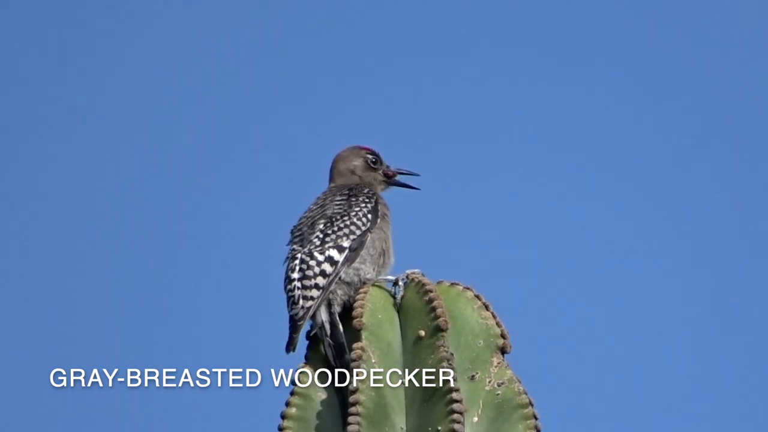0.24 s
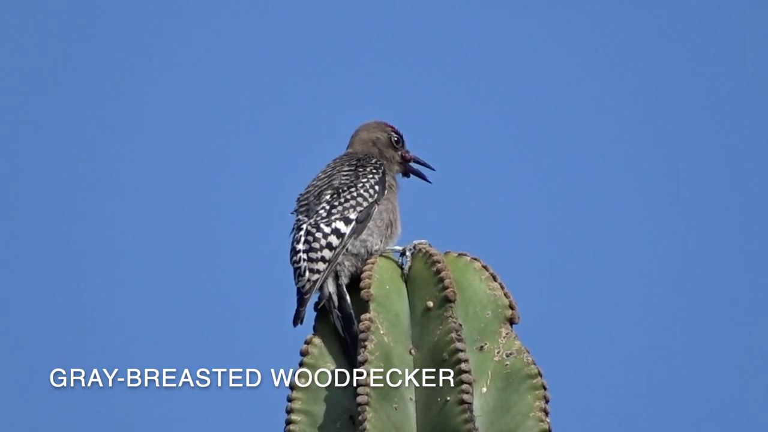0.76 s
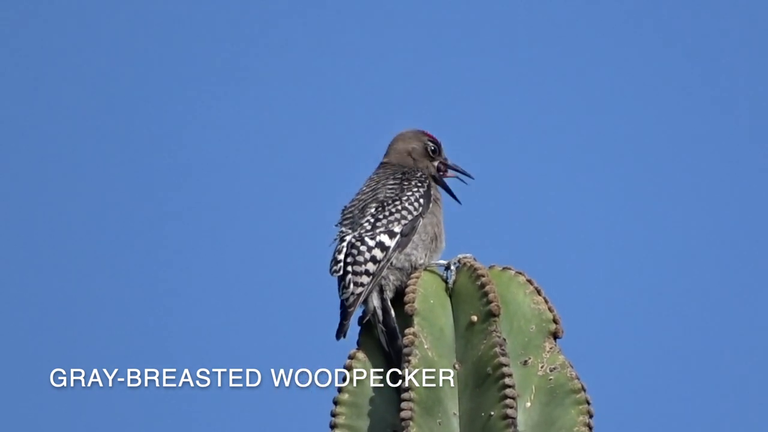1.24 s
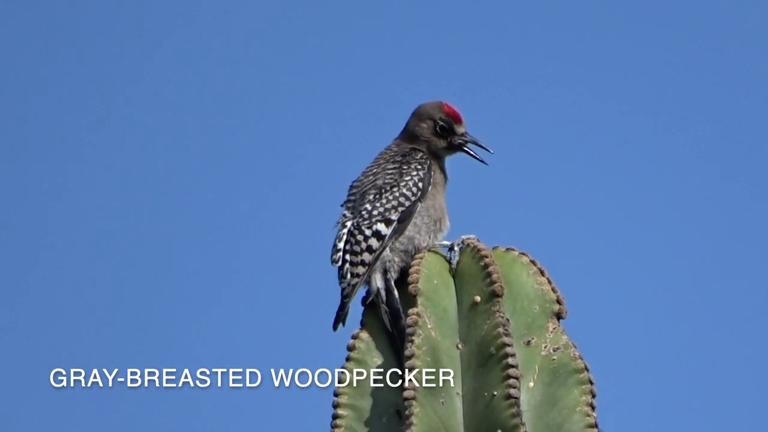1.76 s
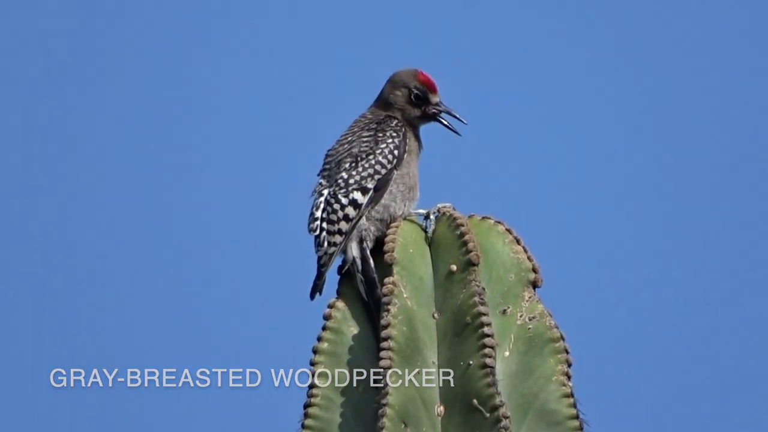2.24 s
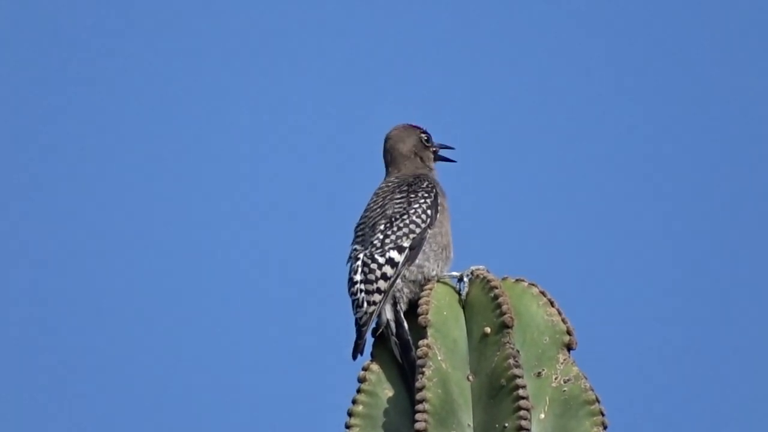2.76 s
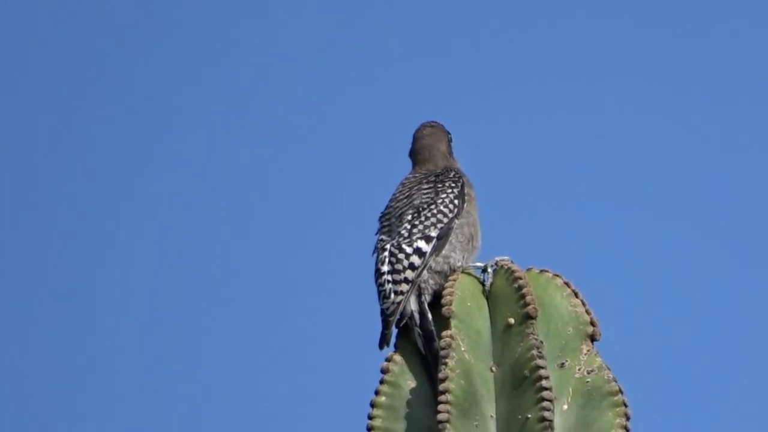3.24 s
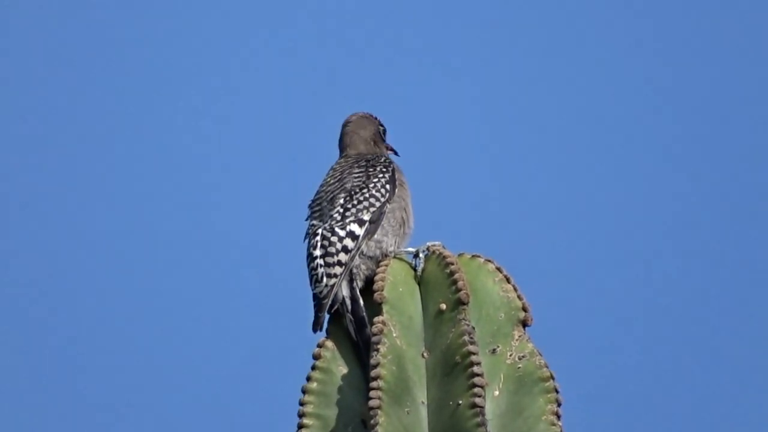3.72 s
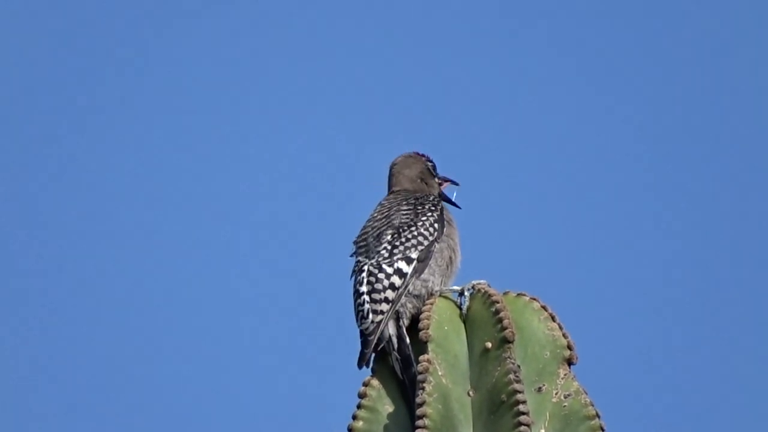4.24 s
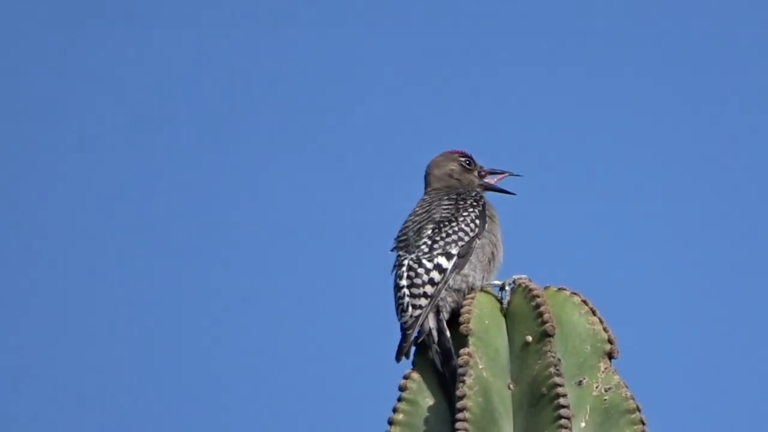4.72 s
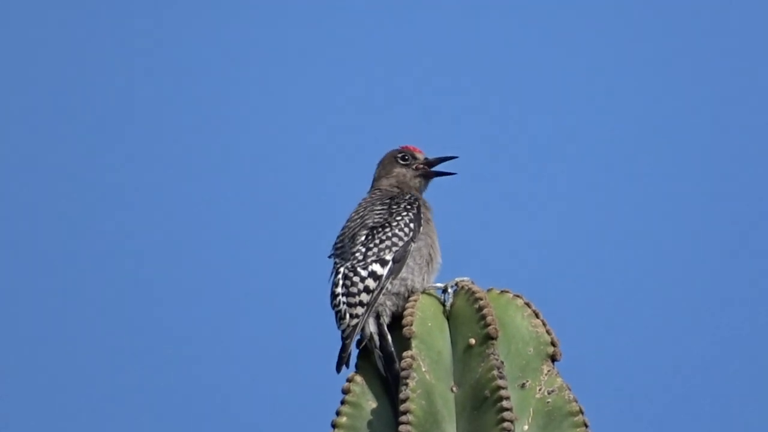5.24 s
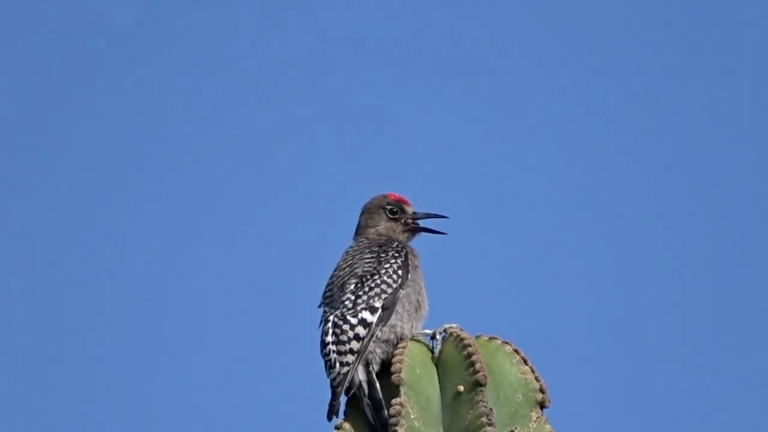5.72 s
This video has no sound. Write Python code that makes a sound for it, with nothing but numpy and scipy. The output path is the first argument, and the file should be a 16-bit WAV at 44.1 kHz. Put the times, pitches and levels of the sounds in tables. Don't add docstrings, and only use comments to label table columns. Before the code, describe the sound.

A woodpecker gives seven sharp, piercing call notes, each trailed by a much softer lower note, over faint open-air hush with insects and distant birds.

```python
import sys
import numpy as np
from scipy import signal
from scipy.fft import rfft, irfft
from scipy.io import wavfile
from scipy.ndimage import uniform_filter1d

SR = 44100
rng = np.random.default_rng(int(sys.argv[2]) if len(sys.argv) > 2 else 0)


def output_pcm(signal):
    pcm = np.clip(np.atleast_2d(signal).T, -1, 1) * 32767
    wavfile.write(sys.argv[1], SR, np.round(pcm).astype(np.int16))


def boost(x):
    u = np.asarray(x, float) / 20
    return 10 ** u


N = 263718

# f/Hz, density/dB
WASH_MID = [(12, -60), (20, -20.5), (60, -11.5), (119, -7.5), (239, -2.5), (430, -3), (839, -4),
            (1000, -7.5), (1640, -12), (3380, -20), (6430, -29.5), (9600, -28.5), (12500, -24.5),
            (15700, -22.5)]
# f/Hz, density/dB
WASH_SIDE = [(12, -55), (20, -31), (55, -23), (186, -11.5), (370, -5), (816, -3.5), (2630, -13),
             (6250, -29.5), (8000, -31.5), (10000, -33), (13600, -29.5), (15700, -42)]
# f/Hz, width/Hz, level/dB, flicker/dB
STEADY_BANDS = [
    (429.8, 40, -68.5, 0.5),
    (647.4, 45, -72.5, 1),
    (833, 104, -70.5, 1),
    (7260, 370, -81.5, 0.5),
    (7740, 530, -80, -1),
]
# t/s, level/dB
WHINE_LEVEL = [(0, -71), (1.2, -74.5), (2, -66), (3, -71), (4, -66), (6, -69.5)]
# t/s, start f/Hz, end f/Hz, length/s, level/dB
TWITTERS = [(.957, 4600, 5000, .012, -71), (.972, 5080, 5140, .080, -70), (1.010, 6700, 5500, .021, -63),
            (1.038, 6500, 6700, .010, -73), (1.143, 6900, 6500, .014, -74), (1.174, 6800, 6800, .012, -74),
            (1.241, 5400, 6500, .014, -68), (1.255, 4900, 5250, .010, -72), (1.264, 5220, 5330, .06, -72),
            (1.312, 6950, 5700, .024, -62), (.002, 3400, 3250, .018, -65), (.192, 3450, 3300, .025, -67),
            (.405, 3450, 3350, .03, -68), (.61, 3800, 3750, .03, -75)]
# t/s, level/dB, left minus right/dB
TICKS = [
    (.6975, -40.5, -4),
    (3.205, -54, .1),
    (2.848, -54, 3),
]
# f/Hz, level/dB, t60/s
TICK_MODES = [(620, -4.7, 0.041), (1330, 2, 0.023), (1910, 2, 0.0068), (3030, -19, 0.0053),
              (4530, -6, 0.0043), (7600, -26, .006)]
# t/s, held f/Hz, length/s, droop power, level/dB
SHARP_NOTES = [
    (1.4995, 1860, .050, 2.2, -37),
    (1.973, 1722, .038, 5.2, -32),
    (2.429, 1805, .036, 4.6, -28.5),
    (4.2282, 1803, .036, 4.6, -30),
    (4.685, 1785, .033, 4.8, -29.5),
    (5.116, 1680, .038, 5.6, -34.5),
    (5.5302, 1758, .031, 5.2, -29),
]
# t/s, held f/Hz, length/s, droop power, level/dB
SOFT_NOTES = [
    (1.661, 838, .038, 2.8, -54.5),
    (2.128, 890, .042, 2.3, -53.5),
    (2.580, 845, .034, 1.9, -51),
    (4.384, 915, .037, 2.3, -53),
    (4.834, 928, .038, 2.2, -52),
    (5.261, 875, .036, 1.9, -54),
    (5.667, 920, .035, 2.4, -51),
]
# f/Hz, level/dB
SHARP_THROAT = [(600, -27), (1100, -21), (1750, -12), (2500, -5.5), (3500, -1.94), (5300, -7.5),
                (7200, -11), (8300, -25), (9100, -47.5), (10500, -50), (12500, -32), (14500, -42)]
# f/Hz, level/dB
SOFT_THROAT = [(500, -21), (850, -7.5), (1700, -4.5), (2600, -3.5), (4300, 2.4), (5900, -2.5), (7200, -6),
               (8100, -18), (10000, -50)]
# t/s, level/dB
FACING_SLOPE = [(1.5, -33), (2.0, -30), (2.43, -8), (2.6, -11), (4.2, -33), (4.7, -33), (5.12, -27),
                (5.55, -19)]
# f/Hz, level/dB
SCATTER_COLOUR = [(800, -4), (1750, 0), (3500, 0.8), (7000, 7), (9000, 23), (12500, 21), (15000, 19)]
# f/Hz, left minus right/dB
BIRD_PAN = [(500, 3), (1700, 6), (3500, 5.2), (7000, 3.2), (9000, .3), (12000, 1)]


def unit(x):
    return x / np.sqrt(np.mean(x ** 2))


def colour_db(table, hz):
    f, db = np.transpose(table)
    return np.interp(np.log(np.maximum(hz, 1)), np.log(f), db)


def shade(x, table, share=1):
    size = x.shape[-1]
    gain = boost(share * colour_db(table, np.fft.rfftfreq(size, 1 / SR)))
    return irfft(rfft(x) * gain, size)


def walk(rate, size):
    k = max(int(SR / rate), 1)
    noise = rng.standard_normal(size + 4 * k)
    smooth = uniform_filter1d(uniform_filter1d(noise, k), k)
    return unit(smooth[2 * k:2 * k + size])


def add(out, x, s, pan_db):
    i = int(s * SR)
    x = x[:N - i]
    out[:, i:i + len(x)] += x * boost(np.array([[pan_db / 2], [-pan_db / 2]]))


def narrow(hz, width):
    phase = 2 * np.pi * hz * np.arange(N) / SR
    return walk(width, size=N) * np.cos(phase) + walk(width, size=N) * np.sin(phase)


def distant_wash():
    f = np.fft.rfftfreq(N, 1 / SR)

    def wash(table):
        spectrum = rfft(rng.standard_normal(N)) * boost(colour_db(table, f)) * (f < 15800)
        return unit(irfft(spectrum, N))

    mid = boost(-57.5) * wash(WASH_MID)
    side = boost(-63) * wash(WASH_SIDE)
    swell = boost(0.4 * walk(1.87, size=N))
    return swell * (mid + side * np.array([[1], [-1]]))


def engines_and_insects():
    out = np.zeros(N)
    for hz, width, db, flicker in STEADY_BANDS:
        out += boost(db + flicker * walk(6.1, size=N)) * narrow(hz, width)
    return out


def far_motor():
    t = np.arange(N) / SR
    level_db = np.interp(t, *np.transpose(WHINE_LEVEL)) + 2 * walk(6.0, size=N)
    return boost(level_db) * np.sin(2 * np.pi * 1308.3 * t + 0.33 * walk(6.4, size=N))


def cricket():
    start_s, period_s = 0.017, 0.19
    cycle = ((np.arange(N) / SR - start_s) / period_s) % 1
    pulse = np.sin(np.pi * np.clip(cycle / .5, 0, 1)) ** .5
    chirp = pulse * boost(-78 + 2.3 * walk(5.6, size=N))
    return chirp * narrow(4380, 170) * boost(np.array([[1.5], [-1.5]]))


def small_birds():
    out = np.zeros((2, N))
    blur_t = np.arange(int(.12 * SR)) / SR
    blur = rng.standard_normal(len(blur_t)) * boost(-60 * blur_t / 0.64)
    blur = blur / np.linalg.norm(blur)
    for s, hz0, hz1, length, db in TWITTERS:
        u = np.arange(int(length * SR)) / (length * SR)
        hz = hz0 + (hz1 - hz0) * u ** 2.2
        whistle = np.sin(2 * np.pi * np.cumsum(hz) / SR)
        tone = np.sin(np.pi * u) ** .5 * whistle * boost(5 * walk(160, size=len(u)))
        add(out, boost(db - 2.0) * tone, s, 0)
        add(out, boost(db - 5.5) * np.convolve(tone, blur), s + 0.0075, 0)
    return out


def ticks():
    out = np.zeros((2, N))
    t = np.arange(int(.04 * SR)) / SR
    ring = sum(boost(db - 60 * t / t60) * np.sin(2 * np.pi * hz * t) for hz, db, t60 in TICK_MODES)
    for s, db, pan in TICKS:
        add(out, -boost(db - 7) * ring, s, pan)
        add(out, boost(db) * ring, s + .0008, pan)
        add(out, boost(db - 12) * ring, s + .012, pan)
    return out


def note_pitch(t, u, held_hz, power, rough, droop, scoop):
    quick = 1 / (1 + np.exp((t + .001) / .0007))
    flat = 1 / (1 + np.exp((t - .048 * rough) / .001))
    hz = held_hz * (1 - droop * u ** power)
    hz = hz * (1 - scoop * max(1 - 4 * rough, 0) * quick)
    hz = hz * (1 - scoop * min(3 * rough, .5) * flat)
    return hz * (1 + 0.062 * rough * walk(500, size=4096)[:len(t)])


def note(held_hz, length, power, rough, db, odd_db, throat, droop, lead, scoop, lead_db, fade_db, tire_db):
    t = np.arange(int((lead + length) * SR)) / SR - lead
    u = np.clip(t / length, 0, 1)
    size = len(t)
    sag = u ** power
    hz = note_pitch(t, u, held_hz, power, rough, droop, scoop)
    phase = 2 * np.pi * np.cumsum(hz) / SR
    start = 1 / (1 + np.exp(-(t + .0012) / .001))
    end = (1 - u ** 12) * boost(fade_db * sag + (tire_db + 16 * rough) * u)

    k = np.arange(1, 1 + int(15000 / held_hz))[:, None]
    khz = k * held_hz / 1000
    gains_db = colour_db(throat, k * hz) + odd_db * (k % 2)
    gains_db = gains_db - 9 * rough * (khz - 3.5)
    gains_db = gains_db - (6 * khz + 18 * (k == 1)) * sag
    voice = (boost(gains_db) * np.sin(k * phase + k * k)).sum(axis=0)
    voice = voice * (1 + .6 * rough * np.sin(phase / 2))
    voice = voice * boost(12 * rough * walk(300, size=4096)[:size])

    breath = unit(shade(rng.standard_normal(size=4096), throat))[:size]
    rasp = .03 + .55 * rough + .3 * sag
    lead_tone = np.sin(2 * np.pi * .93 * held_hz * t)
    lead_in = (1 + t / lead).clip(0, 1) ** 2 * (1 - start) * (lead_tone + 1.3 * breath)
    return boost(db) * (start * end * (voice + rasp * breath) + boost(lead_db) * lead_in)


def woodpecker():
    paths = np.zeros((3, N))
    sharp = dict(throat=SHARP_THROAT, odd_db=-.4, droop=.66, lead=.02, scoop=.2,
                 lead_db=-19, fade_db=11, tire_db=-4.5)
    soft = dict(throat=SOFT_THROAT, odd_db=4, droop=.38, lead=.012, scoop=0.0406,
                lead_db=-8, fade_db=4, tire_db=5)
    full_effort_db = -32
    # notes, roughness, extra roughness per dB, scatter dB, carrying gain dB, voice
    kinds = [(SHARP_NOTES, .035, .05, -2.5, 2.5, sharp), (SOFT_NOTES, .27, 0, .6, -4, soft)]
    for notes, hoarse, per_db, scatter_db, carry_db, kind in kinds:
        for s, hz, length, power, db in notes:
            rough = hoarse + per_db * max(full_effort_db - db, 0)
            x = note(hz, length, power, rough, db + carry_db, **kind)
            slope_db = np.interp(s, *np.transpose(FACING_SLOPE))
            i = int((s - kind["lead"]) * SR)
            paths[:, i:i + len(x)] += x, boost(scatter_db) * x, boost(slope_db) * x
    return paths


def hillside(direct, scattered, sent):
    t = np.arange(int(.9 * SR)) / SR
    mid, side, far = rng.standard_normal((3, len(t)))
    scrub = boost(-60 * t / 0.35)
    rocks = boost(-26.5 - 60 * t / 1.25)
    shape = (1 - np.exp(-(t / .010) ** 2)) * (scrub + rocks)
    shape = boost(-5) * shape / np.linalg.norm(shape)

    slope_s, smear_s = .314, .05
    echo = far * (t > slope_s) * np.exp(-np.abs(t - slope_s) / smear_s)
    echo = signal.sosfilt(signal.butter(2, (2600, 4200), "band", fs=SR, output="sos"), echo)
    echo = boost(-27) * echo / np.linalg.norm(echo)
    centre = direct + signal.fftconvolve(sent, echo)[:N]

    bright = shade(scattered, SCATTER_COLOUR)
    ears = []
    for sign in (1, -1):
        scatter = shape * (mid + sign * 0.079 * side)
        ear = centre + signal.fftconvolve(bright, scatter)[:N]
        ears.append(shade(ear, BIRD_PAN, sign / 2))
    return np.array(ears)


def scene():
    background = distant_wash() + engines_and_insects() + far_motor() + cricket()
    return background + small_birds() + ticks() + hillside(*woodpecker())


def band_limit(x):
    return signal.sosfilt(signal.butter(12, 15840, fs=SR, output="sos"), x)


def record(dry):
    return band_limit(dry)


dry = scene()
out = record(dry)
output_pcm(out)
```